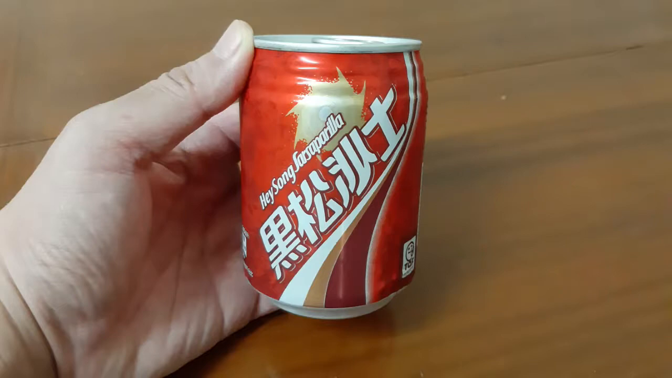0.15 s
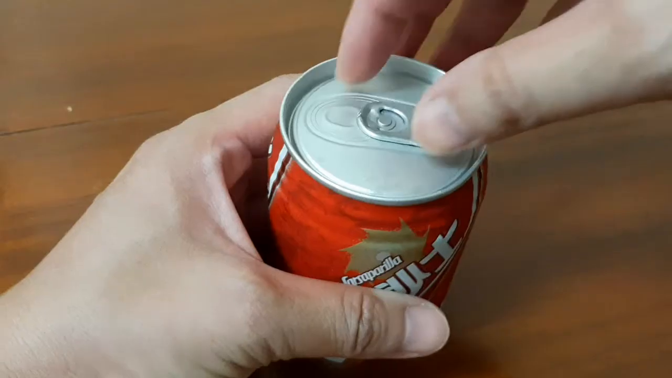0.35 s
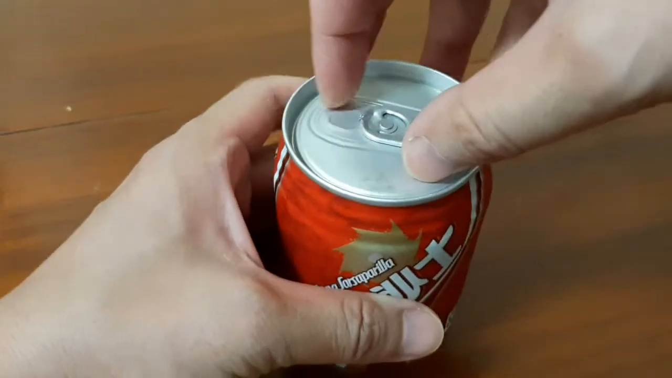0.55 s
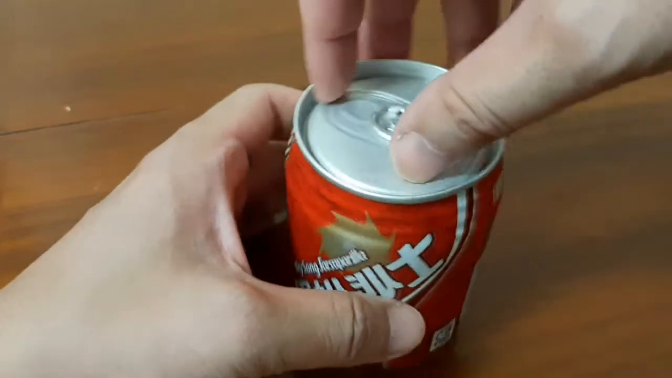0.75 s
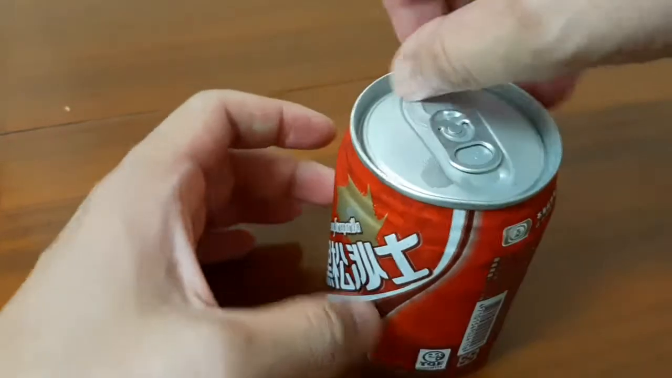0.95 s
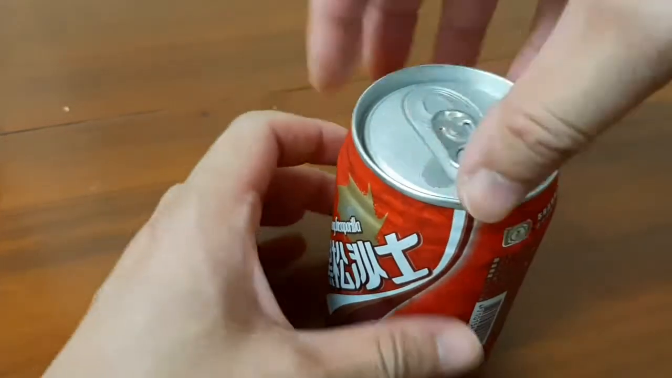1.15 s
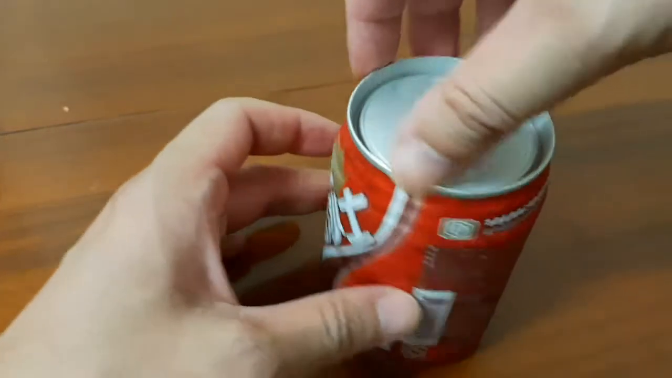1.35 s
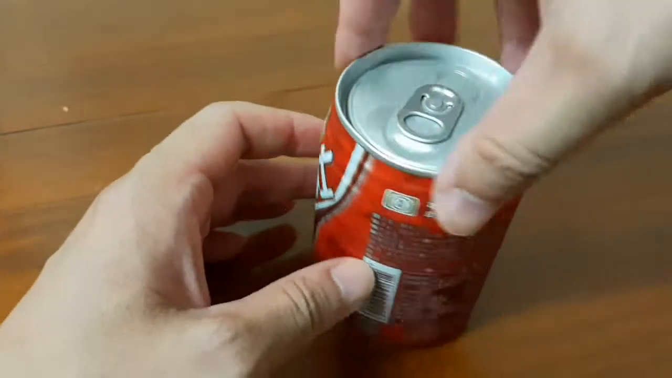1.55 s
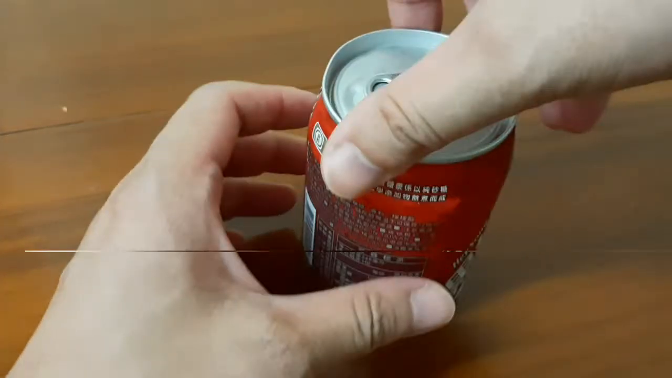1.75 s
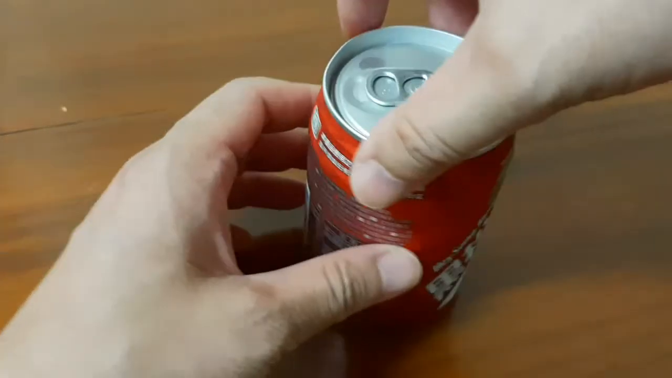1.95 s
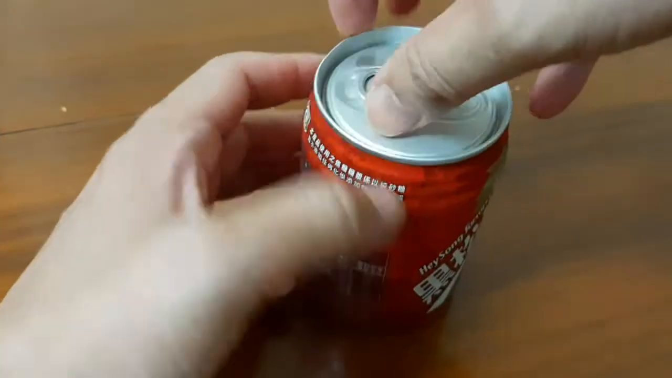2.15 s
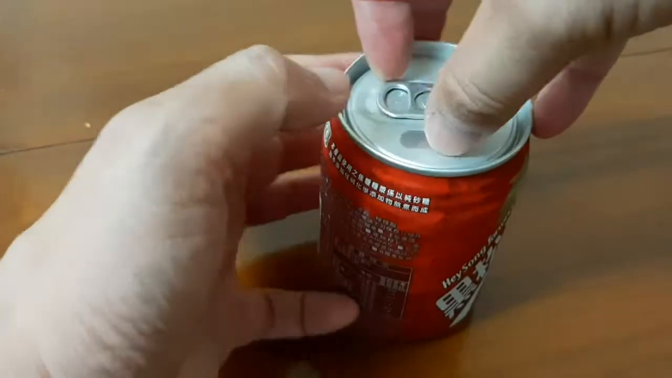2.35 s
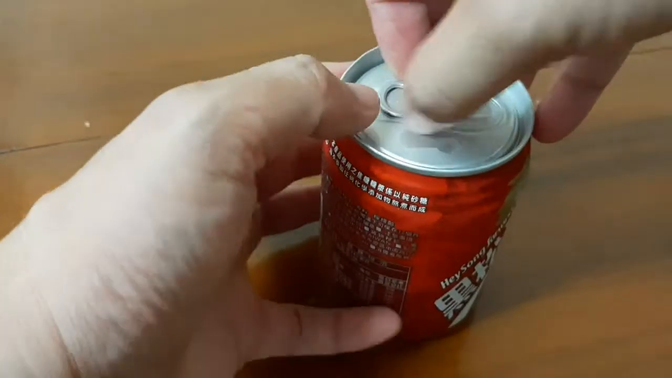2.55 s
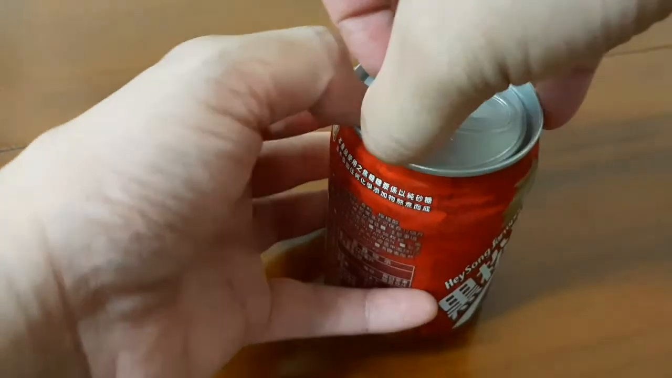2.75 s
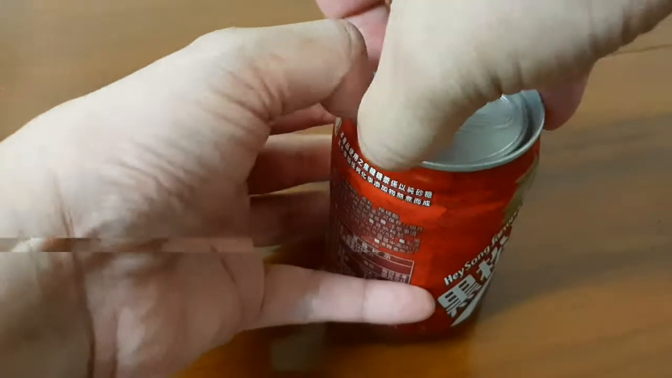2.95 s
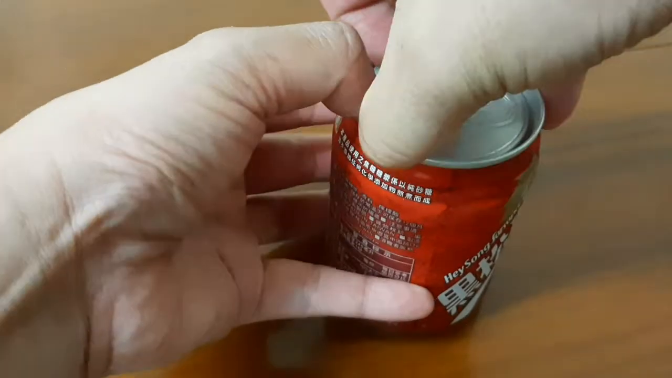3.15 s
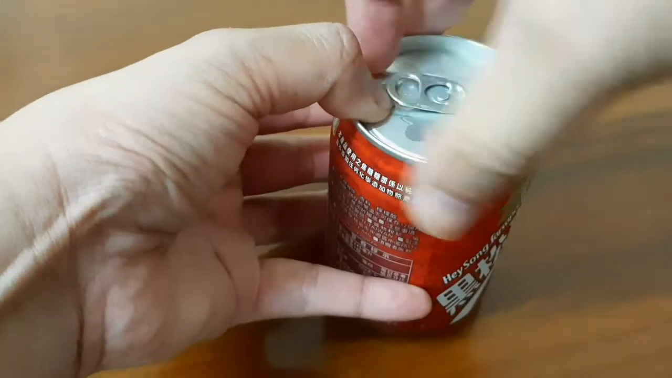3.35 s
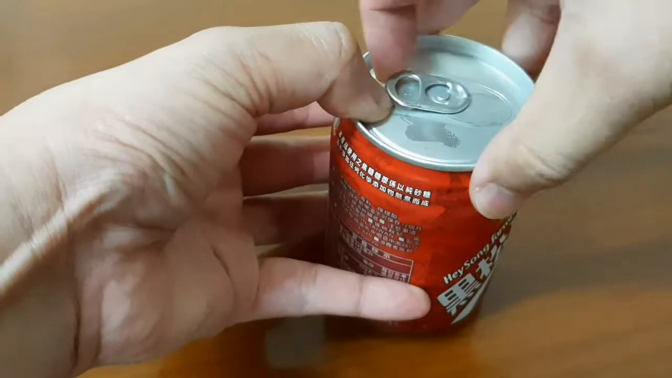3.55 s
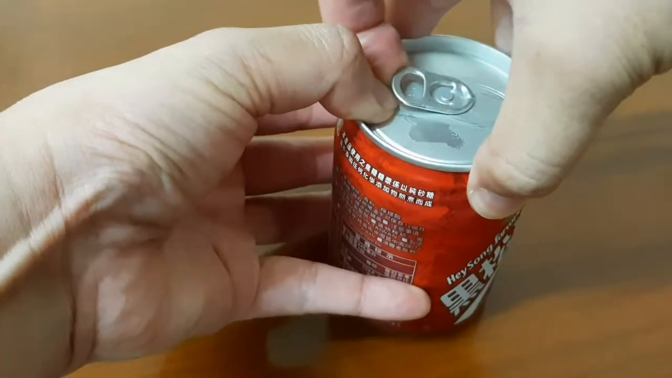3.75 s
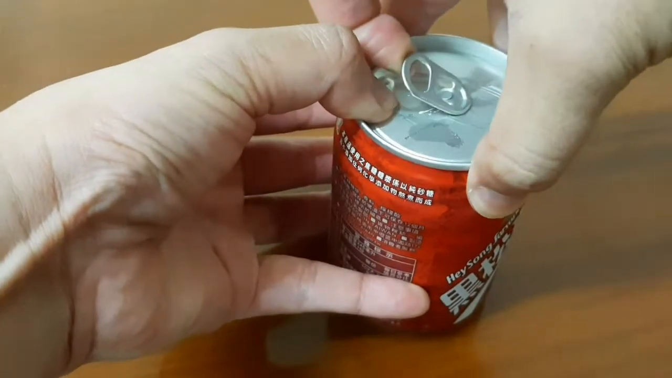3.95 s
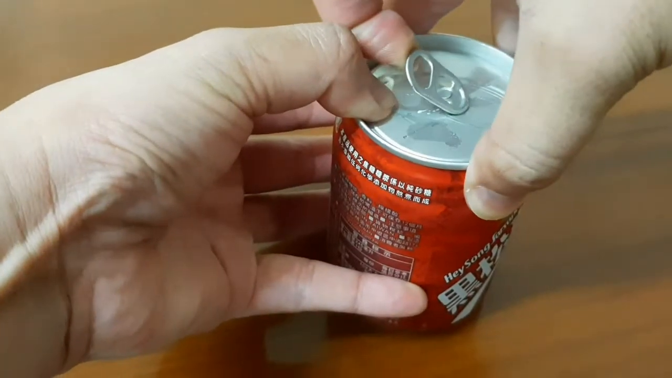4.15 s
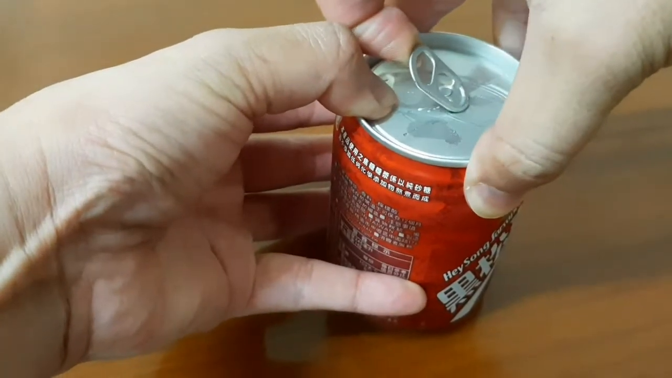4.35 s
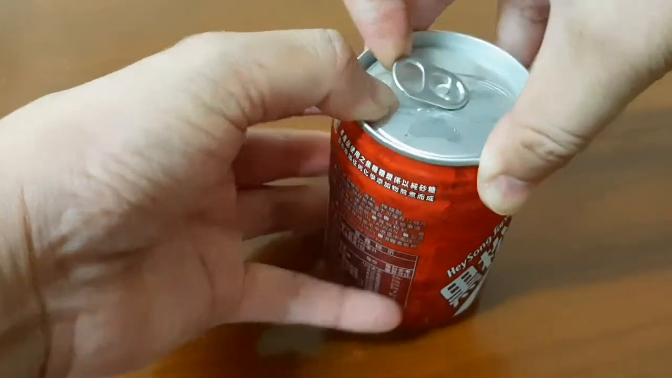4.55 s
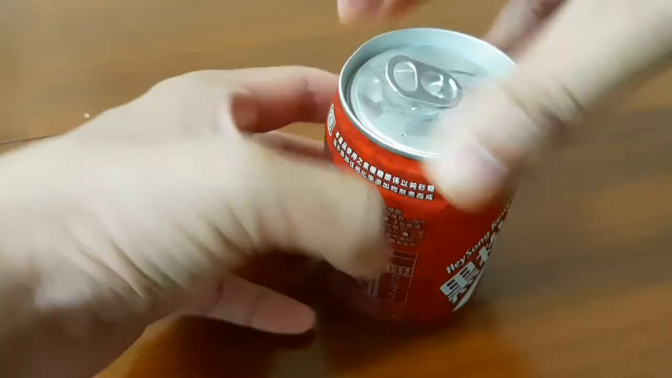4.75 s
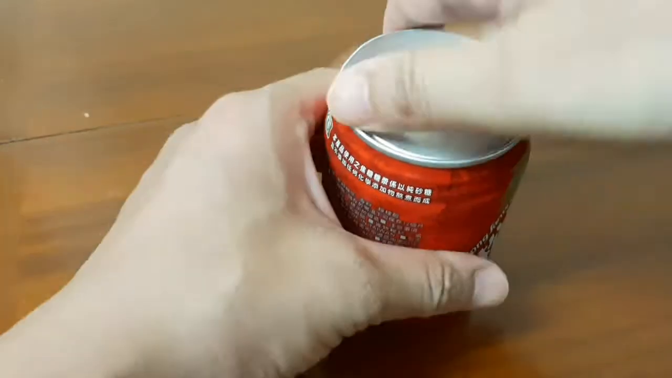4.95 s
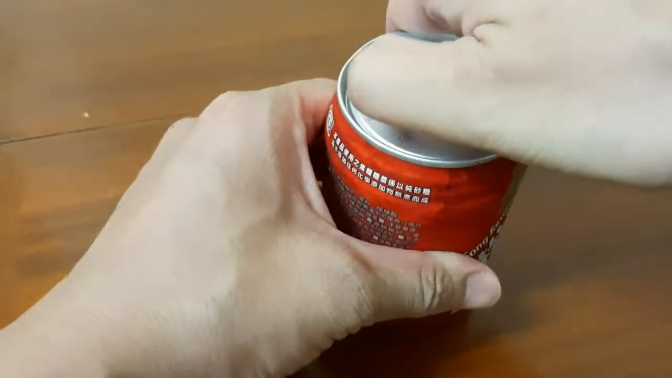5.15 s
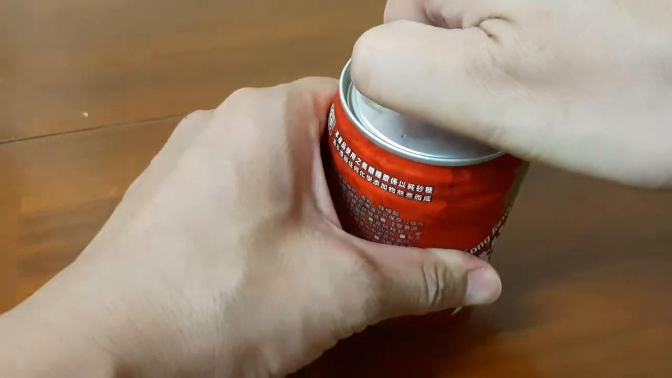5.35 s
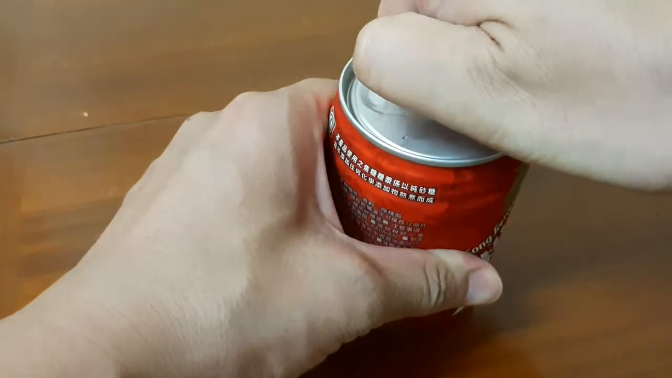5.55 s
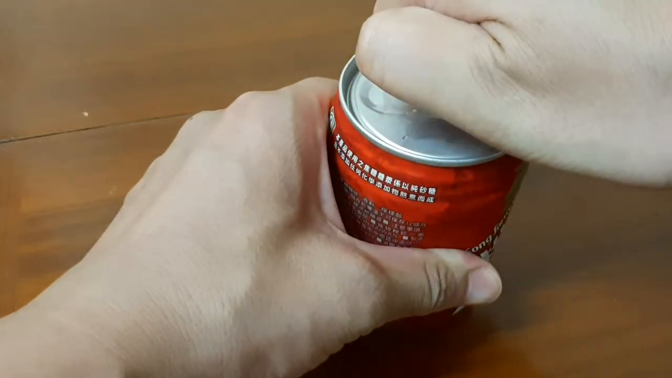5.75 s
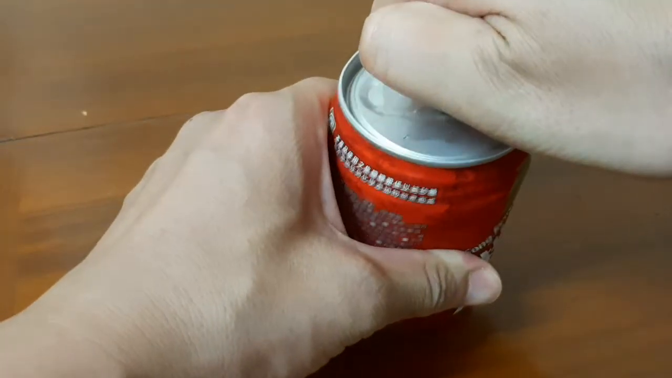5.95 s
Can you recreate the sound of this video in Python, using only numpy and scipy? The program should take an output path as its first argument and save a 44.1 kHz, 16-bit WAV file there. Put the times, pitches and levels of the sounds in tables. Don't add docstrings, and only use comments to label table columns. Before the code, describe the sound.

Close stereo phone pickup in a small room with low motor hum. A full can is set down on a wooden table with a knock, slid and rubbed by fingers, with metallic ticks. The seal snaps and gas spurts in a brief bright hiss, stronger on the left. Background ducks, soft pings follow, a new grip rustles, and the lid rips open with cracks and a hollow boom.

```python
import sys
import numpy as np
from scipy import signal
from scipy.fft import rfft, irfft
from scipy.io import wavfile
from scipy.ndimage import uniform_filter1d

SR = 44100
rng = np.random.default_rng(int(sys.argv[2]) if len(sys.argv) > 2 else 0)


def amplitude_ratio(level_db):
    exponent = np.asarray(level_db, float) / 20
    return 10 ** exponent


def dump_mix(stems):
    frames = np.atleast_2d(stems).T
    limited = np.clip(frames, -1, 1)
    pcm = np.round(limited * 32767).astype(np.int16)
    wavfile.write(sys.argv[1], SR, pcm)


N = 265041
CLOCK = np.arange(N) / SR
SIDES = np.array([[1], [-1]])

START_S, VENT_S, GRIP_S = .411, 4., 5.05

# (frequency [Hz], level [dB], relative ring time [1])
CAN = [(1650, -33, .7), (2020, 0, 1.1), (2310, -2, 1.1), (2540, 0.5, 1.1), (2760, 5, 0.57),
       (3140, 7.5, 0.3), (4000, 2.5, 0.42), (4640, 7, .9), (5330, -8, 1.2), (5880, -4.5, .8),
       (6570, 3.5, .9), (7060, 5, 0.52), (8420, -20.5, .6), (9600, 0, 1.6), (10900, 8.5, .6),
       (12400, -4.5, 0.49), (14500, -3.5, .4)]


def unit(x):
    return x / np.sqrt(np.mean(x ** 2))


def band(x, lo_hz, hi_hz):
    edges_hz = [lo_hz, min(hi_hz, .45 * SR)]
    return signal.sosfilt(signal.butter(3, edges_hz, "band", fs=SR, output="sos"), x)


def ring(x, peaks):
    total = 0
    for hz, width, db in peaks:
        resonance = signal.lfilter(*signal.iirpeak(hz, hz / width, SR), x)
        total = total + amplitude_ratio(db) * np.sqrt(100 / width) * resonance
    return total


def pair(shared):
    mid, side = rng.standard_normal((2, N))
    return np.sqrt((1 + shared) / 2) * mid + np.sqrt((1 - shared) / 2) * side * SIDES


def over_pitch(table):
    f = np.maximum(np.arange(N // 2 + 1) * SR / N, 1)
    hz, value = np.transpose(table)
    return np.interp(np.log(f), np.log(hz), value)


def colour(x, table):
    return irfft(rfft(x) * amplitude_ratio(over_pitch(table)), N)


def flicker(rate, depth_db):
    hold = int(SR / rate)
    levels = np.repeat(rng.standard_normal(N // hold + 1), hold)
    return amplitude_ratio(depth_db * uniform_filter1d(levels, hold)[:N])


def hump(peak, swell, die, db):
    return amplitude_ratio(db - 20 * np.maximum((peak - CLOCK) / swell, (CLOCK - peak) / die))


def die_away(t, t60):
    return np.exp(-np.log(1000) * t / t60)


def add(out, s, sound):
    i = int(s * SR)
    out[..., i:i + sound.shape[-1]] += sound[..., :N - i]


def strike(hz, db, t60, rise_s):
    t = np.arange(int(.4 * SR)) / SR
    phase, lag, *blends_db = rng.standard_normal((4, len(hz), 1))
    push = 1 - np.exp(-(t / rise_s) ** 2)
    envelope = push * die_away(t, t60[:, None]) * amplitude_ratio(db[:, None])
    turn = 2 * np.pi * (hz[:, None] * t + phase)
    ports = [(envelope * amplitude_ratio(1.5 * blends_db[k]) * np.sin(turn + k * .4 * lag)).sum(0) for k in range(2)]
    sound = np.array(ports)
    return sound / np.abs(sound).max()


def phone_gain():
    # (time [s], gain [dB])
    gain_points = [
        (0.7, 1),
        (2.8, -1.5),
        (3.8, -3),
        (4.2, -13.5),
        (5.0, -13.5),
        (5.1, -7),
        (5.28, -4.5),
        (6.0, -4.5),
    ]
    return amplitude_ratio(np.interp(CLOCK, *np.transpose(gain_points)))


def room_tone():
    # (frequency [Hz], density [dB per Hz])
    tone_colour = [(15, -54.5), (25, -24.5), (87, -7.5), (120, -4.5), (145, -13), (170, -6), (317, -3),
                   (354, -7.5), (818, -14.5), (1740, -32), (3520, -37), (5000, -29), (6740, -36.5),
                   (8140, -53.5), (16000, -39.5)]
    # (frequency [Hz], correlation [1])
    tone_shared = [(60, 0.84), (130, 1), (290, 0.87), (640, -0.24), (1410, 0.2), (3100, 0.0), (6820, 1),
                   (15000, -0.03)]
    # (frequency [Hz], width [Hz], level [dB])
    drone = [(169, 8, -7.5), (299, 22, -8), (432, 20, -16)]
    # (frequency [Hz], width [Hz], level [dB])
    whine = [(4878, 250, -2.5), (860, 300, 9)]
    tone_db, hum_db = -56.7, -63
    hum_hz, beat_hz, beat_null_s = 119.95, 4.13, .8

    alike = np.clip(over_pitch(tone_shared), -.9, .98)
    mid, side = rfft(rng.standard_normal((2, N)))
    noise = irfft(np.sqrt(1 + alike) * mid + np.sqrt(1 - alike) * side * SIDES, N)
    air = unit(colour(noise, tone_colour)) * flicker(5, 0.9)
    air = air + amplitude_ratio(-5) * unit(ring(pair(1.0), drone))
    air = air + amplitude_ratio(-31) * unit(ring(pair(.1), whine))
    lift = flicker(3, 1.5) * phone_gain() ** -.12
    upper = signal.sosfilt(signal.butter(1, 600, "high", fs=SR, output="sos"), air)
    air = air + (lift - 1) * upper

    turn = 2 * np.pi * (CLOCK - beat_null_s)
    hum = np.sin(turn * (hum_hz + beat_hz / 2))
    hum = hum - flicker(2.5, 2.5) * np.sin(turn * (hum_hz - beat_hz / 2))
    return phone_gain() * (amplitude_ratio(tone_db) * air + amplitude_ratio(hum_db) * np.sqrt(2) * hum)


def contact():
    # (start [s], end [s], base scraping [dB], skin on the shell [dB])
    slides = [(0.75, 0.84, -62, -67), (0.92, 0.99, -60, -55), (1.0, 1.08, -74, -65), (1.28, 1.36, -61, -63),
              (1.37, 1.41, -55, -56), (1.46, 1.56, -67, -66.5), (1.615, 1.73, -55, -56.5),
              (1.93, 2.0, -67, -66), (2.2, 2.54, -76, -68), (2.6, 2.8, -78, -67), (3.3, 3.45, -70, -72),
              (4.58, 4.68, -75, -74), (5.12, 5.2, -70, -82), (5.56, 5.8, -78, -79)]
    # (peak [s], 20 dB swell [s], 20 dB die [s], base scraping [dB], skin [dB])
    brushes = [(0.414, .004, .06, -53, -47), (0.473, .008, .14, -48, -58), (0.535, .04, .2, -56, -55),
               (0.893, .09, .05, -49, -41), (2.375, .02, .06, -64, -58), (2.432, .01, .1, -71, -61),
               (2.57, .01, .1, -66, -61), (2.653, .02, .08, -76, -59), (3.209, .01, .08, -83, -60),
               (3.27, .03, .09, -55, -59), (3.36, .03, .06, -57, -56), (4.974, .05, .04, -74.5, -79.5),
               (5.527, .005, .14, -65, -63), (5.826, .005, .1, -62, -62), (5.91, .1, .01, -76, -68)]
    # (time [s], time [s])
    hush_s = (3.82, 5.925)
    hold_scrape_db, hold_skin_db, hold_fine_db = -81, -74, -83.5
    edge_s = .085
    fine_db, slack_db = -22.5, 10.5

    strokes = []
    for start, end, scrape_db, skin_db in slides:
        begun = hump(start, edge_s, edge_s, 0) + (CLOCK > start)
        lasting = hump(end, edge_s, edge_s, 0) + (CLOCK < end)
        strokes.append((np.minimum(begun, lasting).clip(0, 1), scrape_db, skin_db))
    for peak, swell, die, scrape_db, skin_db in brushes:
        strokes.append((hump(peak, swell, die, 0), scrape_db, skin_db))

    scrape = amplitude_ratio(hold_scrape_db) * phone_gain()
    skin = amplitude_ratio(hold_skin_db) * phone_gain() ** 2.1
    for shape, scrape_db, skin_db in strokes:
        scrape = np.maximum(scrape, amplitude_ratio(scrape_db) * shape)
        skin = np.maximum(skin, amplitude_ratio(skin_db) * shape)
    fine = amplitude_ratio(fine_db + slack_db * (CLOCK > VENT_S)) * np.sqrt(scrape * skin)
    fine = np.maximum(fine, amplitude_ratio(hold_fine_db) * phone_gain())
    awake = 1 - sum((CLOCK > s) & (CLOCK < s + .03) for s in hush_s)
    return awake * scrape, awake * skin, awake * fine


def hands():
    # (frequency [Hz], width [Hz], level [dB])
    full_modes = [(1110, 70, -9), (2025, 65, 2), (3480, 150, -12)]
    # (frequency [Hz], width [Hz], level [dB])
    slack_modes = [(1050, 600, -9), (1972, 100, -11), (2210, 40, -17), (2660, 150, -12.5)]
    # (frequency [Hz], width [Hz], level [dB])
    rim_modes = [(2380, 60, -4), (2490, 70, 0)]
    # (time [s], level [dB])
    rest = [(.5, -2), (.72, -4), (.78, 4), (.87, 0), (.96, 6), (1.05, -3), (1.32, -9), (1.39, -1),
            (1.5, -6), (1.68, -3), (2., -4)]
    # (frequency [Hz], width [Hz], level [dB])
    skin_modes = [(4050, 90, 5.5), (4515, 70, 4.5), (6060, 120, 3), (7070, 110, -14)]
    slide_ends_s = 2.1

    scrape_gain, skin_gain, fine_gain = contact()
    slips = amplitude_ratio(3.2 * rng.exponential(size=N)) * flicker(90, 2.5) * pair(.3)
    rim = amplitude_ratio(np.interp(CLOCK, *np.transpose(rest))) * unit(ring(slips, rim_modes))
    full = unit(ring(slips, full_modes)) + rim
    slack = unit(ring(slips, slack_modes))
    shell = amplitude_ratio(-1.5) * flicker(25, 2.) * np.where(CLOCK < VENT_S, full, slack)

    held = (CLOCK > slide_ends_s) & (CLOCK < VENT_S) | (CLOCK > GRIP_S)
    rasp = pair(.2)
    broad, woody = unit(band(rasp, 2000, 3050)), unit(band(rasp, 1150, 1750))
    free = band(shell, 850, 4500) + amplitude_ratio(-11) * broad + amplitude_ratio(-10.5) * woody
    scrape = np.where(held, amplitude_ratio(-2) * broad, free)

    whisper = unit(band(band(pair(.1), 3500, 7500), 3500, 7500))
    skin = amplitude_ratio(-3) * unit(ring(slips, skin_modes)) + whisper
    fine = unit(band(pair(0.032), 9400, 16000))
    rub = amplitude_ratio(-4.0) * skin_gain * skin + amplitude_ratio(1.5) * fine_gain * fine
    return scrape_gain * scrape + flicker(40, 1.5) * rub


def tab():
    # (time [s], level [dB])
    tab_rings = [
        (5.5255, -65),
        (5.824, -62.5),
    ]
    # (frequency [Hz], width [Hz], level [dB])
    tab_modes = [(5350, 110, 2), (3140, 150, -4), (6890, 150, -11)]
    buzz = unit(ring(pair(.5), tab_modes))
    fade = sum(amplitude_ratio(db) * (CLOCK > s) * die_away(np.abs(CLOCK - s), 0.45) for s, db in tab_rings)
    return fade * buzz


def squeaks():
    # (peak [s], 20 dB swell [s], 20 dB die [s], level [dB])
    skids = [
        (2.652, .012, .02, -58),
        (2.675, .015, .015, -61),
        (2.687, .012, .008, -59),
        (3.236, .012, .01, -58),
    ]
    # (frequency [Hz], width [Hz], level [dB])
    chirr_modes = [(6350, 300, 0), (7000, 400, -6)]
    chirr = unit(band(ring(pair(.4), chirr_modes), 5300, 7500))
    return sum(hump(*row) for row in skids) * flicker(300, 4) * chirr


def knocks():
    # (time [s], peak [dB], thud t60 [s], table ring [dB])
    base_knocks = [
        (0.471, -19, 0.016, -6),
        (0.477, -23, 0.012, -13),
        (0.8895, -35, 0.01, -3),
        (2.566, -48, 0.027, -6),
        (3.265, -43, 0.027, -6),
        (3.849, -37, 0.02, -8),
        (5.972, -24, .02, -8),
    ]
    # (frequency [Hz], level [dB], t60 [s])
    table_modes = [(237, -5, .25), (268, -10, .35), (292, 5, 0.55), (323, -8, .25), (371, -5, 0.38),
                   (427, -3, 0.25), (495, -10, 0.17), (583, -11, .2), (662, -8, .12), (740, -2, .15),
                   (883, -12, .4), (1090, -7, 0.15)]
    out = np.zeros((2, N))
    hz, db, t60 = np.transpose(table_modes)
    rustle = unit(band(signal.lfilter([1], [1, -.9], pair(0.29)), 250, 3600))
    t = np.arange(int(.4 * SR)) / SR
    thud_db = db + 4 * np.log2(hz / 300)
    for s, peak_db, thud_s, ring_db in base_knocks:
        thud_t60 = np.full(len(hz), max(thud_s, .003))
        add(out, s, amplitude_ratio(peak_db) * strike(hz * 1.337, thud_db, thud_t60, 0.00042))
        add(out, s + .004, amplitude_ratio(peak_db + ring_db) * strike(hz, db, t60, 0.0029))
        piece = rustle[:, int(s * SR / 2):][:, :len(t)]
        add(out, s, amplitude_ratio(peak_db - 21) * piece * die_away(t, 0.52))
    return out


def touch(low_hz, high_hz, high_db, top_db, t60, spread, rise_s):
    hz, db, long = np.transpose(CAN)
    near_low = amplitude_ratio(-9 * (np.log(hz / low_hz) / spread) ** 2)
    near_high = amplitude_ratio(high_db - 25 * (np.log(hz / high_hz) / spread) ** 2)
    share = np.where(hz < 9000, 20 * np.log10(near_low + near_high + amplitude_ratio(-23.5)), top_db + 8)
    modes_hz = np.append(hz, [low_hz, high_hz])
    modes_db = np.append(db + share, [-3, high_db])
    return strike(modes_hz, modes_db, t60 * np.append(long, [1.6, 1.6]), rise_s)


def ticks():
    # (time [s], peak [dB], strongest low mode [Hz], high mode [Hz],
    # high over low [dB])
    hard_ticks = [(0.4132, -32, 2030, 6040, 17), (0.4725, -22, 2020, 6570, -9), (0.648, -50, 5300, 7060, 3),
                  (0.8897, -9, 2560, 6700, 11), (0.8912, -20, 4100, 4600, 0), (2.3718, -27, 4400, 7300, 8),
                  (2.566, -33, 1950, 6670, 7), (3.0197, -55, 1580, 5700, 10), (3.208, -46, 3800, 6140, 8),
                  (3.233, -44, 5900, 6800, 3), (3.2385, -44, 5900, 6600, 3), (3.2453, -26, 5300, 6670, 2),
                  (3.2658, -29, 1900, 6200, 4), (3.356, -44, 2700, 7060, 2), (3.3605, -36, 2760, 6570, 3),
                  (3.363, -34, 2330, 7000, 4), (3.74, -58, 4700, 6500, 2), (3.8481, -16, 3900, 6570, -3),
                  (5.5253, -33, 2200, 5440, 3), (5.726, -56, 2400, 5400, 3), (5.824, -25, 2800, 5410, -3),
                  (5.9385, -19.5, 2700, 5310, -5), (5.9481, -1, 2900, 4640, 3),
                  (5.9612, -9, 2820, 4700, -5), (5.9655, -12, 2310, 3500, -4), (5.9672, -5, 2900, 4600, 3),
                  (5.9335, -37, 2300, 5200, -22),
        (5.9505, -8, 2250, 4660, 6),
        (5.9528, -2, 2360, 4640, -13),
    ]
    # (time [s], peak [dB], low mode [Hz], high mode [Hz], high over low [dB])
    pings = [(1.3371, -55, 2020, 4470, -16), (1.3715, -42.5, 2010, 4610, -7),
             (2.1667, -54.5, 2460, 5470, 12), (2.9694, -50, 1890, 5400, 3), (3.9255, -24, 2010, 6900, 0),
             (4.0354, -49, 1980, 3840, -9), (4.1094, -49, 1940, 3920, -8), (4.1994, -58, 1950, 6380, -4),
             (4.3774, -71, 1950, 4840, -5.5), (4.5523, -56, 1824, 4160, -2), (4.5867, -56, 1960, 4380, -6),
             (4.6094, -55.5, 1965, 4650, -5), (4.6594, -61, 2740, 4330, 5.5),
             (4.9439, -59, 1943, 4340, -5.5), (4.9688, -49, 1905, 4330, -12), (4.9849, -61, 1910, 4880, -6)]
    # (peak [dB], top [dB])
    spark_points = [(-30, -30), (-22, -30), (-17, -22), (-7, -14), (-3, -25)]
    cover_db = -6

    out = np.zeros((2, N))
    t = np.arange(2000) / SR
    for s, peak_db, low_hz, high_hz, high_db in hard_ticks:
        top_db = np.interp(peak_db, *np.transpose(spark_points)) + cover_db * (s > GRIP_S)
        mid, side = rng.standard_normal((2, len(t)))
        snap = band((mid + 0.59 * side * SIDES) * np.exp(-t / .0006), 1600, 8100)
        spark = band(side * np.exp(-t / 0.00081), 8000, 16000)
        modes = touch(low_hz, high_hz, high_db, top_db, t60=0.011, spread=0.4, rise_s=0.00021)
        thin = strike(np.array([high_hz]), np.zeros(1), np.array([.12]), .001)
        add(out, s, amplitude_ratio(peak_db + top_db + 2) * spark)
        add(out, s, amplitude_ratio(peak_db - 7) * snap)
        add(out, s, amplitude_ratio(peak_db) * modes)
        add(out, s, amplitude_ratio(peak_db + min(high_db, 0) - 27) * thin)
    for s, peak_db, low_hz, high_hz, high_db in pings:
        modes = touch(low_hz, high_hz, high_db, -41, t60=.038, spread=.08, rise_s=0.0012)
        add(out, s, amplitude_ratio(peak_db) * modes)
    return band(out, 1700, 19000)


def seal():
    # (frequency [Hz], level [dB])
    lid_modes = [(1940, -13), (2630, -11), (3620, -4), (4020, 1), (5050, -6), (5750, -9), (6500, -6),
                 (7290, -10)]
    # (time [s], peak [dB])
    cracks = [
        (3.8478, -7),
        (3.8513, -22),
        (3.8593, -17),
    ]
    out = np.zeros((2, N))
    hz, db = np.transpose(lid_modes)
    for s, peak_db in cracks:
        add(out, s, amplitude_ratio(peak_db) * strike(hz, db, np.full(len(hz), .016), .0004))
    return out


def jet():
    # (time [s], level [dB])
    flow_points = [
        (3.849, -12),
        (3.854, -16),
        (3.859, -16),
        (3.862, -4),
        (3.897, -2),
        (3.929, 0),
        (3.957, -10),
        (4.225, -50),
        (4.35, -64),
    ]
    # (frequency [Hz], density [dB per Hz])
    jet_top = [(4410, -34.5), (7500, -10), (8110, -19), (9570, -5.5), (10400, 1.5), (12000, 0), (15100, 5),
               (16300, -10.5)]
    # (frequency [Hz], width [Hz], level [dB])
    slit_modes = [(3750, 700, -4), (4750, 800, -2), (6150, 800, -3), (7000, 900, -1)]
    # (peak [s], 20 dB swell [s], 20 dB die [s], level [dB])
    splutter = (3.89, .06, .06, -28)
    jet_db, roar_db, rumble_db = -25, -29, -38
    jet_power, roar_power = 1.2, .93

    s, db = np.transpose(flow_points)
    flow = amplitude_ratio(np.interp(CLOCK, s, db, left=-200, right=-200))
    pan = amplitude_ratio(np.interp(CLOCK, (3.86, 3.93), (7, 2)))
    balance = np.array([np.sqrt(pan), 1 / np.sqrt(pan)])
    hiss = amplitude_ratio(jet_db) * flow ** jet_power * unit(colour(pair(.1), jet_top)) * balance

    whistle = unit(band(ring(pair(.05), slit_modes), 2600, 8200))
    wet = hump(*splutter) * (CLOCK > s[0]) * amplitude_ratio(np.array([[0], [-17]]))
    low = amplitude_ratio(rumble_db) * flow ** roar_power + wet
    rumble = amplitude_ratio(-4) * low * unit(band(pair(.1), 1000, 3000))
    roar = amplitude_ratio(roar_db) * flow ** roar_power * whistle + rumble
    return amplitude_ratio(2.5) * flicker(200, 2.) * (hiss + amplitude_ratio(-1.0) * roar)


def spits():
    # (time [s], peak [dB], swing back [dB])
    gusts = [(3.8691, -10.5, -2), (3.8711, -12, -13), (3.8731, -7, -14), (3.874, -8.5, 1),
             (3.8753, -14, -14), (3.8771, -12, -12), (3.8784, -14, -10), (3.8789, -13, -7),
             (3.8803, -8, -1), (3.8809, -6.5, -4), (3.8819, -16, -12), (3.8843, -6, -7),
             (3.8873, -11.5, -10), (3.8883, -10, -3), (3.8893, -9, -4), (3.8897, -14, 0),
             (3.8912, -13.5, -12), (3.8921, -8, -5), (3.893, -9, -8), (3.8956, -6.5, -4), (3.8978, -7, -9),
             (3.8982, -13, 0), (3.9014, -8.5, -8), (3.9062, -16.5, -9), (3.9072, -14, -8),
             (3.9125, -14, -10), (3.9175, -8.5, -7)]
    port_hz, port_db, port_s = 3700, -8, .0005
    lead_s = .0003
    out = np.zeros((2, N))
    t = np.arange(300) / SR
    push = np.exp(-((t - lead_s) / .00005) ** 2)
    late = np.maximum(t - .00037, 0) / 0.00017
    swing = np.e * late * np.exp(-late)
    cavity = amplitude_ratio(port_db) * np.exp(-t / port_s) * np.sin(2 * np.pi * port_hz * (t - lead_s))
    for s, peak_db, back_db in gusts:
        gust = cavity + 1.5 * push - amplitude_ratio(back_db) * swing
        add(out, s - lead_s, amplitude_ratio(peak_db) * gust * np.array([[1], [.02]]))
    return out


def boom():
    # (time [s], level [dB], from [Hz], to [Hz], glide [s], t60 [s])
    neck = (5.976, -24, 760, 930, .012, .25)
    s, db, from_hz, to_hz, glide, t60 = neck
    t = np.maximum(CLOCK - s, 0)
    turn = 2 * np.pi * (to_hz * t + (from_hz - to_hz) * glide * (1 - np.exp(-t / glide)))
    return amplitude_ratio(db) * flicker(90, 2.5) * die_away(t, t60) * np.sin(turn)


def tear():
    # (time [s], peak [dB])
    gulp_times = [
        (5.9527, -18),
        (5.972, -15),
    ]
    tear_s, gape_s = 5.949, 5.972
    mouth_hz, mouth_width_hz = 900, 60

    torn = CLOCK > tear_s
    slips = flicker(300, 2.1)
    lid_modes = [(hz, 260, db) for hz, db, _ in CAN[:9]]
    lid = hump(gape_s, .1, .1, -15) * unit(ring(slips * pair(0.3), lid_modes))
    top = hump(tear_s, .01, .11, -30.5) * unit(band(slips * pair(.1), 8500, 16000))
    mouth = hump(gape_s, .066, .3, -27) * unit(ring(pair(0.38), [(mouth_hz, mouth_width_hz, 0)]))
    wood = hump(gape_s, .03, .07, -29) * unit(band(pair(.85), 100, 600))

    gulps = np.zeros((2, N))
    gulp_hz, gulp_db = mouth_hz * np.array([.75, 1., 1.3]), np.array([-3., 0., -4.])
    for s, peak_db in gulp_times:
        add(gulps, s, amplitude_ratio(peak_db) * strike(gulp_hz, gulp_db, np.full(3, .02), 0.00069))
    return torn * (amplitude_ratio(-6) * lid + top + amplitude_ratio(-6) * mouth + wood) + gulps + boom()


def room(x):
    room_t60_s, room_dull_hz, room_db = 0.31, 6000, -13
    t = np.arange(int(.7 * SR)) / SR
    noise = rng.standard_normal((2, len(t))) * (t > .003) * die_away(t, room_t60_s)
    dull = signal.lfilter(*signal.butter(1, room_dull_hz, fs=SR), noise)
    tail = dull + (noise - dull) * np.exp(-t / .05)
    tail = tail / np.sqrt(np.sum(tail ** 2) / 2)
    return amplitude_ratio(room_db) * signal.fftconvolve(x.mean(0)[None], tail, axes=1)[:, :N]


def scene():
    can = ticks() + seal() + jet() + tear()
    base = band(knocks(), 140, 9000)
    gusts = band(spits(), 45, 18000)
    can[1] = np.where(CLOCK < GRIP_S, np.roll(can[1], 3), np.roll(can[1], 1))
    base[1] = np.roll(base[1], 5)
    swell = np.clip((CLOCK - START_S) / 0.04, 0, 1)
    background = swell * room_tone() + hands() + tab() + squeaks()
    return background + can + base + gusts + room(can + base + amplitude_ratio(-12) * gusts)


def low_pass(x):
    return signal.sosfilt(signal.butter(12, 16660, fs=SR, output="sos"), x)


def record(dry):
    ceiling, top_hz = .95, 15900
    faded = dry * np.clip((CLOCK - START_S) / .006, 0, 1) ** 2
    rounded = faded / (1 + (faded / ceiling) ** 4) ** .25
    heard = signal.sosfilt(signal.ellip(10, .2, 70, top_hz, fs=SR, output="sos"), rounded)
    return low_pass(heard)


dry = scene()
out = record(dry)
dump_mix(out)
```